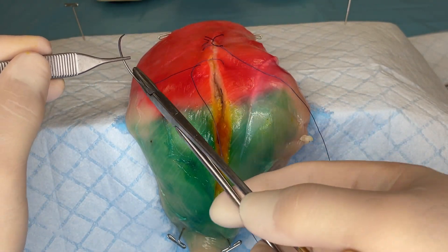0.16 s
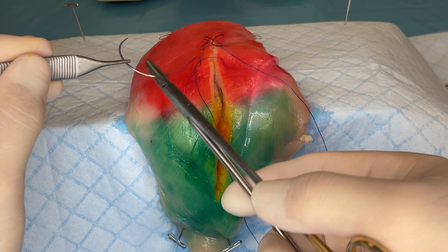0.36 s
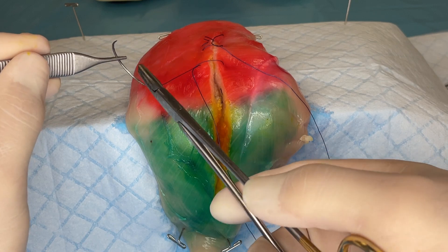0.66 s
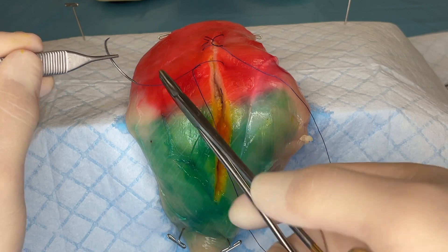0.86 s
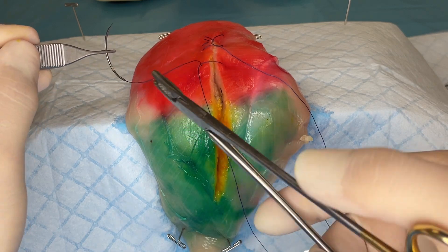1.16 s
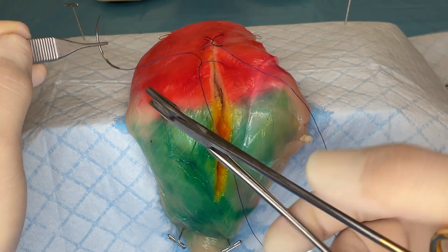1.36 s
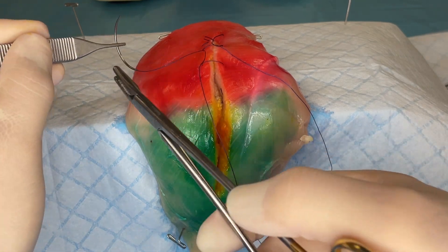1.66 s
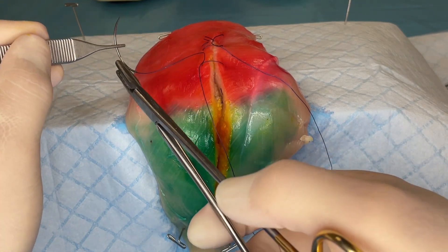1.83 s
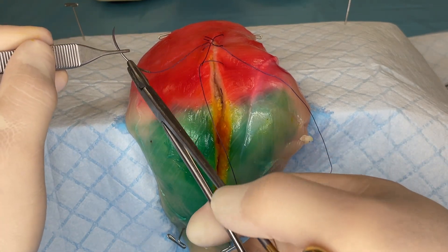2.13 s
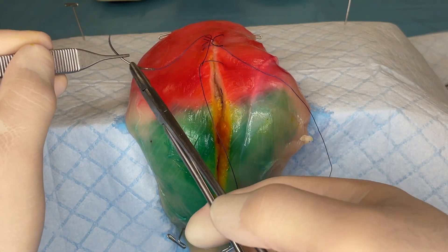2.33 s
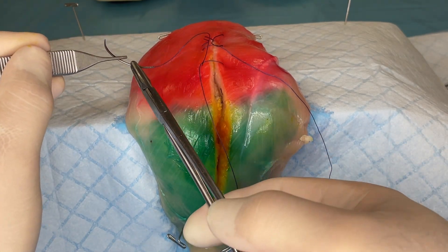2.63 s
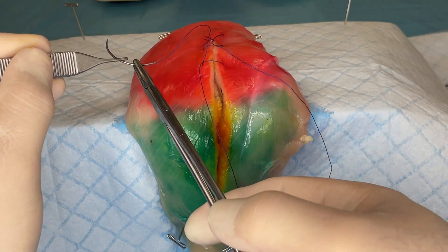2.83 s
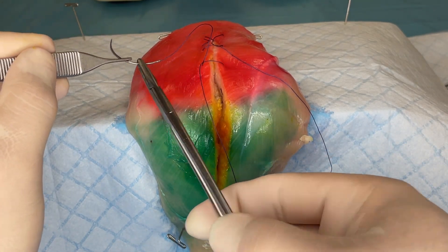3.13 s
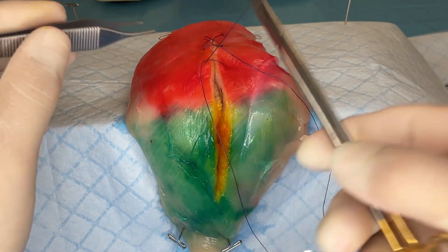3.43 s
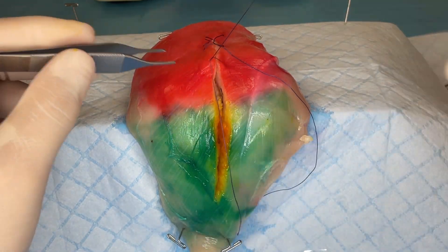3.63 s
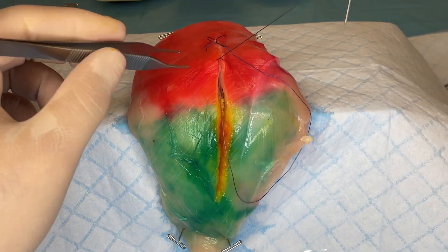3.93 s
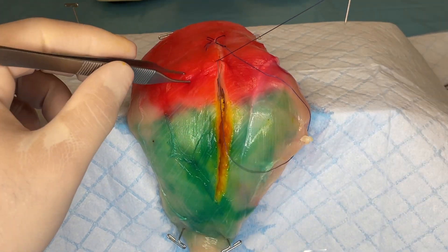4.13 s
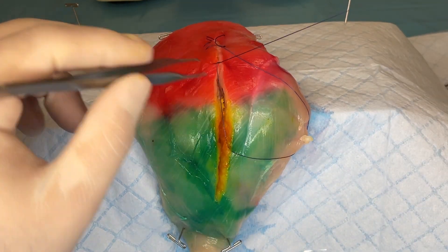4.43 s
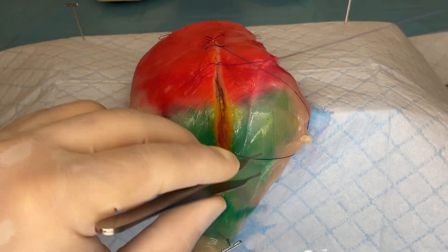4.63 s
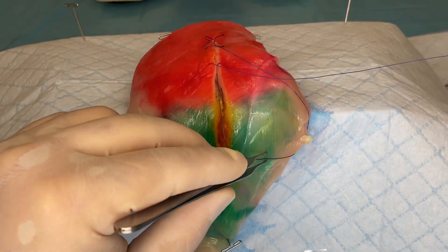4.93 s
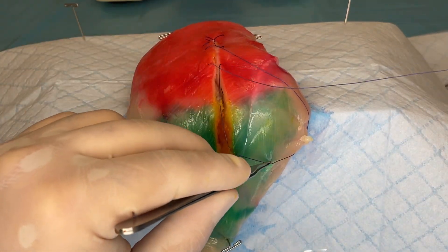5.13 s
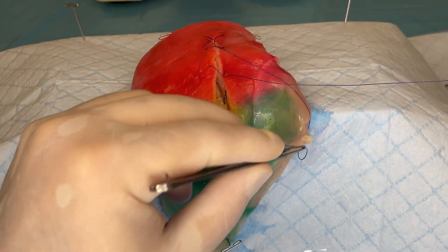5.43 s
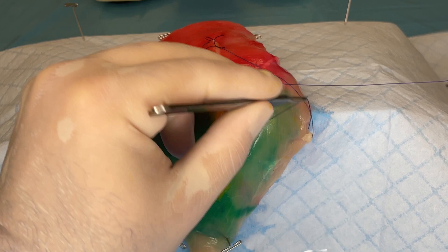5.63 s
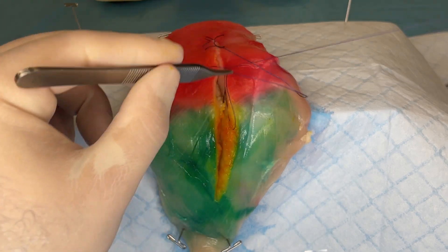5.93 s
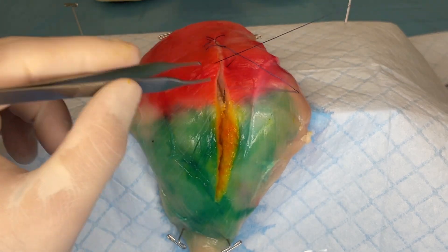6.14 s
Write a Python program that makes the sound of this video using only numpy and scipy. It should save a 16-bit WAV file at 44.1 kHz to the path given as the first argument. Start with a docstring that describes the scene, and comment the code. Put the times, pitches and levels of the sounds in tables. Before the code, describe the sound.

Fine metal instruments are handled at a bench, heard very near with a short room tail. Irregular small clicks and short steel scrapes come in clusters, with muffled bench bumps beneath. Then come the loudest sounds, quick ratchet snaps with a high lingering ring, followed by a whispery thread pull and drape rustle. A heavy low thump and dull padded taps lead to a sparse ending with a few faint ticks.

```python
"""A low room rumble under faint hiss, a hand brushing a drape, then small steel ticks: suturing practice on a bench.
A small stereo microphone stands close by in a quiet room. Forceps and needle holder tick, scrape and snap: bursts of
tiny impacts or uneven slips excite damped resonances, and each snap of the ratchet leaves the holder's shanks ringing.
Drawn thread is patchy filtered noise, joined by a thin ring, perhaps of the moved holder; bench bumps are sinking
swings; taps on the specimen are dull bursts. Instruments, taps and thread are also heard through the room's tail."""
import sys
import numpy as np
from scipy import signal
from scipy.fft import rfft, irfft
from scipy.io import wavfile
from scipy.ndimage import uniform_filter1d

SR = 44100
rng = np.random.default_rng(int(sys.argv[2]) if len(sys.argv) > 2 else 0)


def generate_wav(signal):
    """Clip the signal to [-1, 1] and save it as 16-bit WAV at the path in sys.argv[1]."""
    frames = np.transpose(np.atleast_2d(signal))
    scaled = np.clip(frames, -1, 1) * 32767
    pcm = np.round(scaled).astype(np.int16)
    wavfile.write(sys.argv[1], SR, pcm)


N = 277389
TIME, FREQ = np.arange(N) / SR, np.fft.rfftfreq(N, 1 / SR)
HIT_SIZE = 8192  # samples in the buffer of one contact
HIT_TIME, HIT_FREQ = np.arange(HIT_SIZE) / SR, np.fft.rfftfreq(HIT_SIZE, 1 / SR)


def undb(db):
    """Decibels to gain."""
    return 10 ** (np.asarray(db) / 20)


def unit(x):
    """Scale to rms 1."""
    return x / np.sqrt(np.mean(x ** 2))


def over_hz(points, freq):
    """Join (Hz, value) points on a log-frequency axis."""
    hz, value = np.transpose(points)
    return np.interp(np.log(freq + 1), np.log(hz), value)


def add(track, s, sound):
    """Mix a sound into the track at time s."""
    i = max(int(s * SR), 0)
    track[i:i + len(sound)] += sound[:N - i]


def noise(colour):
    """Noise of a given spectrum, rms 1."""
    white = rng.standard_normal(N)
    return unit(irfft(rfft(white) * undb(over_hz(colour, FREQ)), N))


def with_level(sound, db, length=1 / 100):
    """Give a sound the energy of that level held for that length in seconds."""
    return sound * undb(db) * np.sqrt(length * SR / np.sum(sound ** 2))


def decay_60db(t, t60):
    """Exponential fade that loses 60 dB in t60 seconds."""
    return np.exp(-np.log(1000) * t / t60)


# How wide the diffuse sound lies at the microphone.
# Each row: frequency in Hz, side minus mid in dB.
SIDE_WIDTH = [(40, -16), (120, -11), (400, -6), (1300, -2), (2800, -13), (4800, -15), (7000, -2),
              (15000, 0)]


def spread(mid, side):
    """Left and right of a diffuse sound from a common and an opposed part."""
    side = irfft(rfft(side) * undb(over_hz(SIDE_WIDTH, FREQ)), N)
    return np.array([mid + side, mid - side])


# Low rumble of the quiet room. Each row: frequency in Hz, relative density in dB per Hz.
RUMBLE_SPECTRUM = [(15, -38.5), (28, -13), (48, 1.5), (70, 0), (100, -7.5), (145, -8.5), (200, -17.5),
                   (300, -21), (400, -32), (700, -44.5), (2000, -64), (16000, -100)]
# Faint hiss over it. Each row: frequency in Hz, relative density in dB per Hz.
HISS_SPECTRUM = [(20, -20.5), (60, -7.5), (300, 3), (600, -3), (1100, -12), (2000, -10.5), (3000, -15.5),
                 (7000, -20), (8300, -30.5), (10000, -24.5), (12500, -29), (14000, -36.5), (16000, -42)]
RUMBLE_DB, HISS_DB = -58, -79.5
# The rumble's one dip: level changes in dB, times in seconds.
DIP_DB, RETURN_DB = -23.5, 22.5
DIP_S, DIP_FALL_S, DIP_END_S, DIP_RETURN_S = 4.33, 0.061, 4.78, 0.6


def background(waver_db=3.0):
    """Wavering low room rumble, which sinks once and comes back weaker, under a faint even hiss."""
    fall = np.clip((TIME - DIP_S) / DIP_FALL_S, 0, 1)
    back = np.clip((TIME - DIP_END_S) / DIP_RETURN_S, 0, 1)
    waver = waver_db * noise([(6, 1.5), (20, -40), (60, -120)])
    rumble_gain = undb(RUMBLE_DB + DIP_DB * fall + RETURN_DB * back + waver)
    parts = []
    for _ in range(2):  # common, then opposed
        parts.append(rumble_gain * noise(RUMBLE_SPECTRUM) + undb(HISS_DB) * noise(HISS_SPECTRUM))
    return spread(*parts)


# What the small room sends back. Each row: frequency in Hz, gain in dB.
ROOM_RETURN = [(300, 6), (1200, -2.5), (2500, -2), (4000, -3.5), (7000, -7.5), (8300, -14), (9700, -6.5),
               (12500, -6), (14000, -11), (15500, -15)]


def room(x, t60=0.28, wet_db=-14, build=0.0019):
    """A small room's diffuse tail builds up in milliseconds and dies away, its width varying with frequency."""
    t = TIME[:SR]
    tails = []
    for white in rng.standard_normal((2, SR)):
        tail = white * decay_60db(t, t60) * (1 - np.exp(-(t / build) ** 2))
        wet = signal.fftconvolve(x, tail / np.sqrt(np.sum(tail ** 2)))[:N]
        tails.append(irfft(rfft(wet) * undb(wet_db + over_hz(ROOM_RETURN, FREQ)), N))
    return spread(*tails)


# Level between the microphone's two ports. Each row: frequency in Hz, left minus right in dB.
PORT_LEVEL = [(60, .2), (125, .3), (250, 1.4), (500, 2.8), (1300, 1.5), (2400, 2), (4400, 0), (15000, -.5)]
# Phase between the same ports. Each row: frequency in Hz, left minus right in radians.
PORT_SHIFT = [(40, -.1), (90, -.24), (150, -.42), (400, -.48), (950, -.35), (1900, -.1), (5300, .1),
              (6900, -1.1), (8200, -3.1), (11000, -5.9), (14000, -8.5), (16000, -8.6)]


def ports(x):
    """Direct sound reaches the two microphone ports with a little level and phase difference."""
    half = undb(over_hz(PORT_LEVEL, FREQ) / 2)
    left = half * np.exp(1j * over_hz(PORT_SHIFT, FREQ))
    return irfft(rfft(x) * np.array([left, 1 / half]), N)


# Hands sliding over the drape. Each row: start in seconds, length in seconds, level at mid-stroke in dB.
BRUSH_STROKES = [(0.017, 0.34, -73), (3.449, 0.69, -69.5), (5.05, .65, -74)]
# Dull colour of the drape. Each row: frequency in Hz, relative density in dB per Hz.
DRAPE_SPECTRUM = [(60, -14.5), (170, -3.5), (240, -7.5), (315, 1), (400, -12), (700, -23.5), (1800, -30),
                  (3000, -38.5), (12000, -59.5)]


def brushes():
    """A hand sliding over the padded drape gives a dull swell of noise."""
    level = np.zeros(N)
    for s, length, db in BRUSH_STROKES:
        level += undb(db) * np.sin(np.pi * np.clip((TIME - s) / length, 0, 1))
    return level * noise(DRAPE_SPECTRUM)


# Hands bumping the bench. Each row: start in seconds, level of the push in dB, nominal pitch in Hz.
BENCH_BUMPS = [(0.28, -37, 65.4), (.395, -40, 62), (1.019, -50, 53.4), (2.195, -37.5, 74), (2.239, -30, 85),
               (2.268, -38, 57), (2.392, -38, 64), (2.452, -45, 68), (2.502, -45, 62), (4.024, -19, 92.8),
               (4.08, -35, 68), (4.12, -28, 80.26), (4.24, -37.5, 62.9), (4.3, -44, 62)]
# Every bump is a swing, two higher knocks and a slow rebound. Each row: ratio to the nominal pitch,
# delay in seconds, gain in dB at the hardest push, extra dB per dB of push.
SWING_PARTS = [(1.025, 0, -0.5, 0), (1.93, -0.002, -5, 0.64), (3.32, 0.001, -16.5, 0.5),
               (.62, 0.016, -16, 0.5)]


def bumps(sag=0.14, rub_db=-27, rise_cycles=1.18):
    """A push swings the bench a few cycles, sinking in pitch, as the hand rubs the drape; harder ones knock higher."""
    swing, push = np.zeros(N), np.zeros(N)
    hardest_db = max(db for _, db, _ in BENCH_BUMPS)
    for s, db, pitch in BENCH_BUMPS:
        for ratio, delay, part_db, growth in SWING_PARTS:
            hz = pitch * ratio
            age = HIT_TIME * hz / rise_cycles  # 1 at the peak of the push
            peak = undb(db + part_db + growth * (db - hardest_db))
            force = peak * (age * np.exp(1 - age)) ** 2.4
            sinking_hz = hz * (1 + sag * (2 * np.exp(-age) - 1))
            add(swing, s + delay, force * np.sin(2 * np.pi * np.cumsum(sinking_hz) / SR))
            add(push, s + delay, force)
    rub = noise([(30, -15.5), (150, 7.5), (300, -4), (600, -30.5), (1500, -49.0), (8000, -85.0)])
    return swing + undb(rub_db) * push * rub


def chatter(decay, rise, size=60):
    """Hard faces meet in a dense burst of tiny impacts with an even spectrum."""
    envelope = (1 - np.exp(-HIT_TIME / rise)) * np.exp(-HIT_TIME / decay)
    burst = rfft(rng.standard_normal(HIT_SIZE) * envelope)
    even = irfft(burst / np.sqrt(uniform_filter1d(np.abs(burst) ** 2, size)))
    return even * (np.arange(HIT_SIZE) < HIT_SIZE // 2)  # drop what wraps round to the end


def body(force, modes, low_db=0, top_db=0):
    """Causal response of damped resonances to a force; the place of contact tilts lows and top."""
    power = 0
    for hz, width, db in modes:
        power = power + undb(db) ** 2 / (1 + (2 * (HIT_FREQ - hz) / width) ** 2) ** (3 / 2)
    tilt_db = over_hz([(1500, low_db), (2800, 0.0023), (7000, 0.0045), (10000, top_db)], HIT_FREQ)
    gain = np.sqrt(power) * undb(tilt_db)
    cepstrum = irfft(np.log(gain))  # folded forward in time, it gives the minimum phase
    cepstrum[1:HIT_SIZE // 2] *= 2
    cepstrum[HIT_SIZE // 2 + 1:] = 0
    return irfft(rfft(force) * np.exp(rfft(cepstrum)))


# Soft taps of fingers and forceps on the padded specimen.
# Each row: start in seconds, level over 10 ms in dB, decay in seconds.
SPECIMEN_TAPS = [(4.432, -64.5, 0.018), (4.507, -59, 0.016), (4.546, -61, 0.023), (5.046, -60.5, 0.016)]
# Resonances of the specimen. Each row: frequency in Hz, width in Hz, level in dB.
SPECIMEN_MODES = [(262, 97, 0.5), (415, 210, -7.5), (588, 89, 0.5), (1006, 810, -26)]


def taps():
    """Dull contacts excite the damped resonances of the padded specimen."""
    out = np.zeros(N)
    for s, db, decay in SPECIMEN_TAPS:
        tap = body(chatter(decay, rise=0.0014, size=12), SPECIMEN_MODES)
        add(out, s, with_level(tap, db))
    return out


# One pull of thread through the tissue: its time and level, and the pitch of the thin ring heard with it.
PULL_S, PULL_LENGTH_S, PULL_ATTACK_S, PULL_DB, PULL_FADE_DB_PER_S = 3.44, .63, 0.067, -77, 21
RING_START_HZ, RING_END_HZ, RING_GLIDE_S = 6950, 7593, 0.15


def thread(width_hz=220, rub_db=-1.5, patchy_db=3):
    """Drawn thread rubs in fits, while a thin ring, perhaps of the moved holder, rises and fades."""
    age = np.maximum(TIME - PULL_S, 0)
    hz = RING_END_HZ + (RING_START_HZ - RING_END_HZ) * np.exp(-age / RING_GLIDE_S)
    patches = patchy_db * noise([(12, -2), (30, -42), (90, -120)])
    db = PULL_DB - PULL_FADE_DB_PER_S * age + patches
    flutter = noise([(width_hz, 0), (4 * width_hz, -40), (8 * width_hz, -80)])
    thin_ring = unit(flutter * np.sin(2 * np.pi * np.cumsum(hz) / SR))
    rub = noise([(1000, -20.5), (4500, -9.5), (6000, -5.5), (6600, -6.5), (9200, -5.5), (11000, -13),
                 (15000, -16.5)])
    swell = np.clip(np.minimum(age, PULL_LENGTH_S - age) / PULL_ATTACK_S, 0, 1)
    return swell * undb(db) * (thin_ring + undb(rub_db) * rub)


# Resonances of the instrument tips. Each row: frequency in Hz, width in Hz, level in dB.
TIP_RESONANCES = [(1400, 1200, -14.5), (2450, 210, -1), (3365, 370, -2.5), (4480, 340, 1),
                  (5100, 520, -3.5), (6000, 320, -2.5), (7050, 350, 1), (9090, 640, 2), (10950, 1700, 2),
                  (11850, 360, 2.5), (12800, 300, 1.5), (14200, 400, -0.5), (16400, 180, 8)]


def ringing(x, main_hz, ring_db=-3, others_db=-8, detune=.015, t60=0.07):
    """The contact's resonance, and by chance the tips' others, ring on briefly until the fingers damp them."""
    fade = decay_60db(HIT_TIME, t60)
    modes = np.sin(2 * np.pi * main_hz * HIT_TIME)
    chances = rng.standard_normal((len(TIP_RESONANCES), 2))
    for (hz, *_), (share, shift) in zip(TIP_RESONANCES[1:], chances):
        other = np.sin(2 * np.pi * hz * (1 + detune * shift) * HIT_TIME)
        modes = modes + undb(others_db) * share * other
    return x + undb(ring_db) * signal.fftconvolve(x, 2 * modes * fade / fade.sum())[:HIT_SIZE]


# The high ring that all tip contacts share, and its relative scatter.
UPPER_RING_HZ, UPPER_RING_SCATTER = 11900, .015


def contact(force, low_db, top_db, main_hz, main_db=5, upper_db=-1, main_width_hz=450, upper_width_hz=800,
            shrill_db=3, squeak=2.0):
    """Each place of contact brings out its own resonance; the brightest contacts squeak in the high ring."""
    upper_hz = UPPER_RING_HZ * (1 + UPPER_RING_SCATTER * rng.standard_normal())
    # top colour beyond shrill_db goes into the high ring instead
    ring_db = upper_db + squeak * max(top_db - shrill_db, 0)
    modes = list(TIP_RESONANCES) + [(main_hz, main_width_hz, main_db), (upper_hz, upper_width_hz, ring_db)]
    return ringing(body(force, modes, low_db, min(top_db, shrill_db)), main_hz)


# Shifts of the grip. Each row: start in seconds, end in seconds.
GRIP_SHIFTS = [(0.699, 1.13), (1.981, 2.26), (4.9, 5.25)]


def fidgets(count=3, level_db=-78, scatter_db=2, top_db=4, decay=.001):
    """While the grip shifts, the tips touch faintly at random moments and places."""
    out = np.zeros(N)
    for start, end in GRIP_SHIFTS:
        for when, strength, place in rng.random((count, 3)):
            ring_hz = TIP_RESONANCES[1 + int(place * 6)][0]
            touch = contact(chatter(decay, decay), 0, top_db, ring_hz)
            db = level_db + scatter_db * (2 * strength - 1)
            add(out, start + when * (end - start), with_level(touch, db))
    return out


# Steel sliding on steel. Each row: start in seconds, length in seconds, level over that length in dB,
# low colour in dB, top colour in dB, ring in Hz.
STEEL_SCRAPES = [(0.217, 0.044, -70, 0.5, -9.5, 2370), (0.284, 0.022, -80.5, 5, -3, 2360),
                 (0.866, 0.048, -68, -26, 12, 5240), (0.984, 0.039, -72, 11, -10, 1980),
                 (2.364, 0.051, -61.5, 0, -4.5, 4570), (2.476, 0.038, -74, -3, 7, 4500),
                 (2.885, 0.0135, -76, -5, -1, 4270), (4.971, 0.062, -78.5, 0.5, -2, 3900)]


def scrapes(slips_per_s=2000, scatter_db=4):
    """Sliding jaws stick and slip in uneven grains."""
    out = np.zeros(N)
    for s, length, db, *colour in STEEL_SCRAPES:
        sizes = undb(scatter_db * rng.standard_normal(HIT_SIZE))
        slips = (rng.random(HIT_SIZE) < slips_per_s / SR) * sizes
        pressure = np.sin(np.pi * np.minimum(HIT_TIME / length, 1))
        scrape = contact((slips - slips.mean()) * pressure, *colour)
        add(out, s, with_level(scrape, db, length))
    return out


# Knock of the needle holder's gripped handles. Each row: frequency in Hz, width in Hz, level in dB.
HANDLE_MODES = [(1260, 350, -1.5), (1790, 220, 5.5), (2130, 400, -1), (3550, 440, -12), (5700, 1500, -16)]
UNLATCH_S, UNLATCH_DB = 0.9748, -50  # level over 10 ms


def unlatch(decay=0.00145, rise=0.00044):
    """The handles come off the ratchet with a dull knock."""
    out = np.zeros(N)
    knock = body(chatter(decay, rise), HANDLE_MODES)
    add(out, UNLATCH_S, with_level(knock, UNLATCH_DB))
    return out


# Long ring of the holder's shanks. Each row: frequency in Hz, peak after the first tooth in dB,
# time to fall 60 dB in seconds.
SHANK_RINGS = [(2520, -66, 0.66), (5960, -68.5, 1), (6330, -73, .8), (7410, -71.5, 1.3), (7500, -75, 1.9),
               (8800, -70, 0.95), (12700, -61, .4), (14300, -79, 1.1)]


def shanks(detune=.002):
    """Each ratchet tooth leaves the two slightly unlike shanks ringing."""
    out = np.zeros(N)
    t = TIME[:SR]
    first_db = RATCHET_TEETH[0][1]
    for s, db, *_ in RATCHET_TEETH:
        for hz, mode_db, t60 in SHANK_RINGS:
            pair_hz = hz * (1 + detune * rng.standard_normal((2, 1)))
            pair = np.sin(2 * np.pi * pair_hz * t).mean(0)
            add(out, s, undb(mode_db + db - first_db) * pair * decay_60db(t, t60))
    return out


# Snaps of the holder's ratchet. Each row: start in seconds, level over 10 ms in dB, low colour in dB,
# top colour in dB, chatter decay in seconds.
RATCHET_TEETH = [(3.1972, -19.5, 0.5, 3, 0.0011), (3.2479, -22, 2.5, 0.5, .0015),
                 (3.3223, -41.5, 3.5, -9.5, 0.00059)]
# Resonances of the ratchet. Each row: frequency in Hz, width in Hz, level in dB.
RATCHET_RESONANCES = [(594, 660, -10.5), (1530, 360, -5.5), (2560, 280, 2), (4500, 400, -4),
                      (5130, 1300, 0.5), (6150, 290, 4), (6990, 230, 2), (8530, 680, 2.5), (8800, 510, -5),
                      (10894, 1900, -5), (12536, 380, 2), (13500, 910, 1.5), (15616, 260, 2.5)]


def ratchet(rise=.002):
    """The sprung handles slip over a tooth and slam onto the next."""
    out = np.zeros(N)
    for s, db, low_db, top_db, decay in RATCHET_TEETH:
        snap = body(chatter(decay, rise, size=40), RATCHET_RESONANCES, low_db, top_db)
        add(out, s, with_level(snap, db))
    return out


# Light steel contacts close to the microphone. Each row: start in seconds, level over 10 ms in dB,
# low colour in dB, top colour in dB, ring in Hz.
STEEL_TICKS = [(0.0542, -68, -6, 3, 6750), (0.4273, -71, -12, 11, 2330), (0.5574, -68, -7, 0, 7000),
               (0.5815, -51, 2, 2, 7500), (0.5867, -36.5, -4.5, 3.5, 5470), (0.688, -63, -14, -5, 5100),
               (0.711, -59, -8, 9, 7700), (0.7865, -57, -14, 11, 7800), (0.9145, -64, -30, -4, 5140),
               (1.0082, -67, 19, -6, 4300), (1.0229, -52, -6, -10.5, 3660), (1.1048, -48.5, 3, -5.5, 4490),
               (1.137, -65.5, 9.5, -8, 7460), (2.068, -65, -15, 7.5, 6150),
               (2.0907, -64.5, -11, -0.5, 5060), (2.1671, -56.5, -19, 1, 4250), (2.3642, -61, 9, 6, 4570),
               (2.3769, -47.5, -10, -1.5, 7120), (2.4025, -57.5, -5, -3, 4440),
               (2.7568, -52.5, -5, 4.5, 6330), (2.8648, -69.5, -4, -2, 5880), (3.1367, -52.5, 4, -1, 5000),
               (3.177, -63, -29, -8.5, 6080), (5.0023, -68.5, -2, -7.5, 5700),
               (5.8716, -64.5, 9, -8.5, 6100), (5.8847, -67, 5, -13, 3034)]


def ticks(decay=.001, rise=0.0012, graze_db=-17, graze_lead=0.003):
    """Tips and needle graze each other, then meet with a short chatter."""
    out = np.zeros(N)
    for s, db, *colour in STEEL_TICKS:
        graze = contact(chatter(decay, decay), *colour)
        add(out, s - graze_lead, with_level(graze, db + graze_db))
        meeting = contact(chatter(decay, rise), *colour)
        add(out, s, with_level(meeting, db))
    return out


def scene():
    """Instruments and hands heard directly, the instruments, taps and thread also through the room."""
    near = taps() + thread() + fidgets() + scrapes() + unlatch() + shanks() + ratchet() + ticks()
    return background() + room(near) + ports(near + bumps() + brushes())


TOP_HZ = 16100


def record(dry):
    """The recorder cuts the top with a steep low-pass."""
    return signal.sosfilt(signal.ellip(8, .2, 70, TOP_HZ, fs=SR, output="sos"), dry)


dry = scene()
out = record(dry)
generate_wav(out)
```